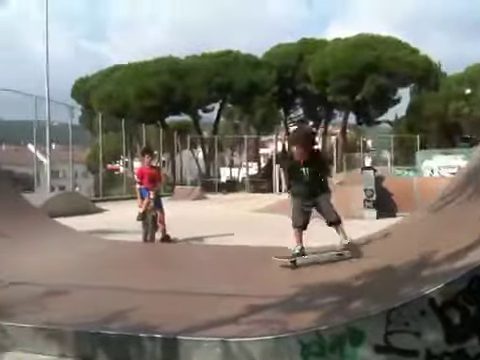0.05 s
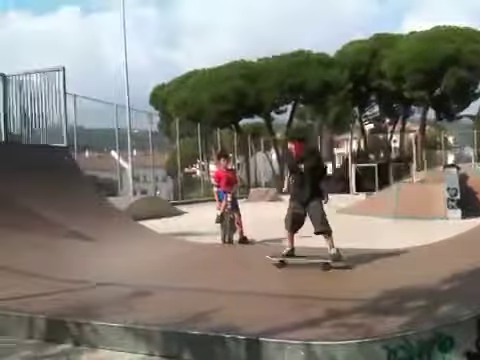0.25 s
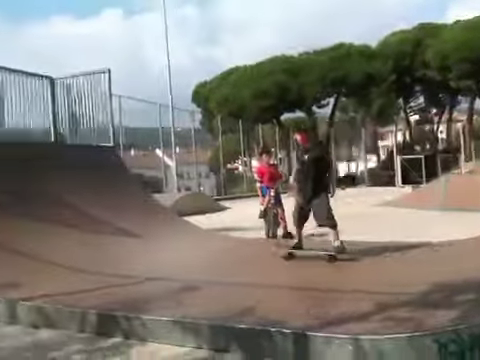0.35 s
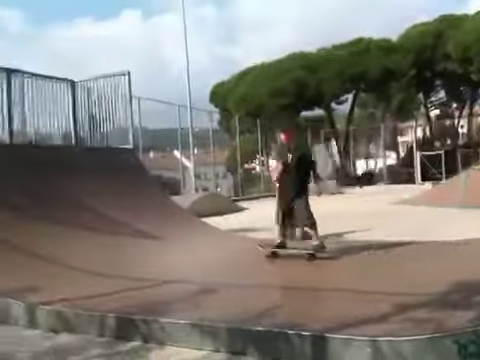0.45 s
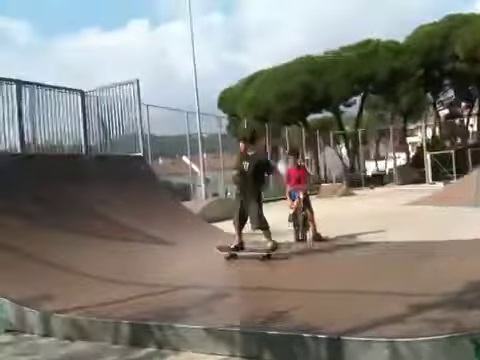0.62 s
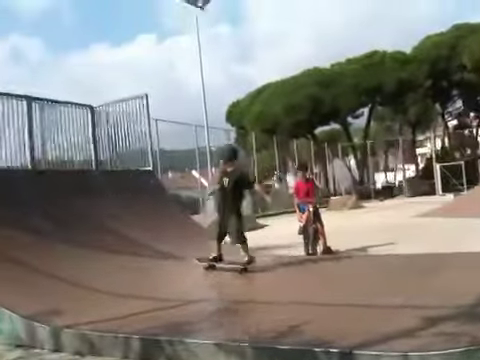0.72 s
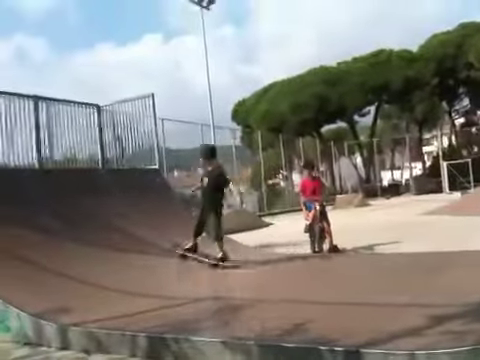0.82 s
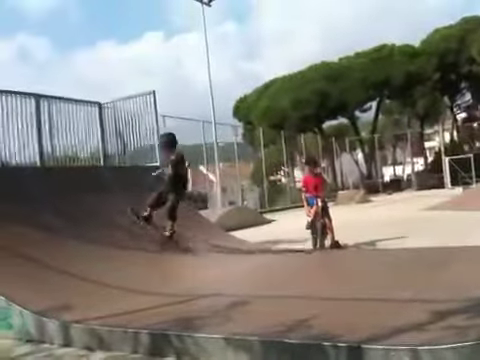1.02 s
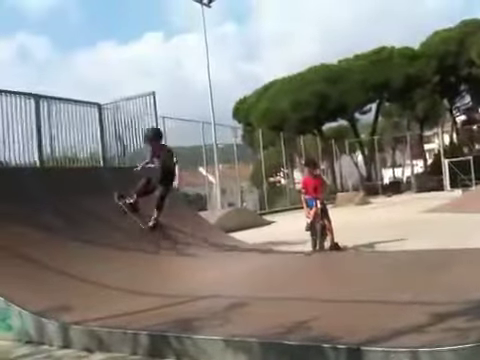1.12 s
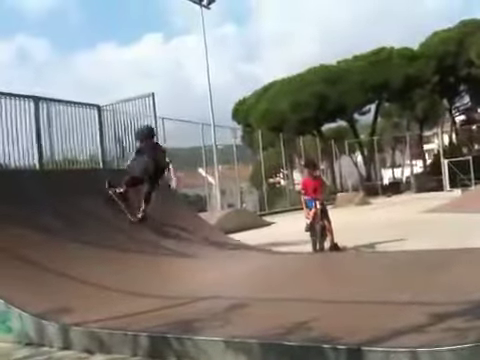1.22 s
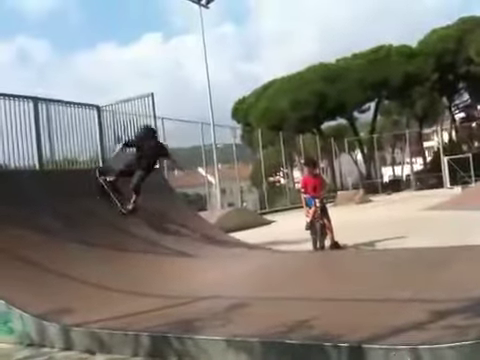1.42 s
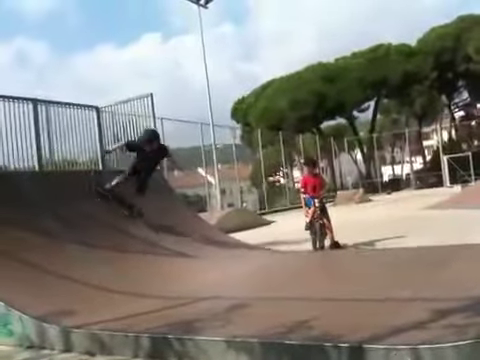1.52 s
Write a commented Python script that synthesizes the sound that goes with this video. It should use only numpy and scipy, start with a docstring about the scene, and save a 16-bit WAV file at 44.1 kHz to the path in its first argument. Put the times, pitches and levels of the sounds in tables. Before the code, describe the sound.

Skateboard wheels roll and rasp over a ramp, clacking at seams as the trucks rattle.

```python
"""A skateboard rolls across the flat of an outdoor ramp and climbs the far wall.
Surface grain drives the ramp into forced vibration, a rumble, while the wheels rasp and hiss.
Impacts at drops and seams excite damped modes: the ramp thumps and the deck clacks.
Metal parts of the trucks rattle, most clearly as the board slows near the top.
The ramp walls scatter a short echo, over faint outdoor air."""
import sys
import numpy as np
from scipy import signal
from scipy.fft import rfft, irfft
from scipy.io import wavfile

SR = 44100
rng = np.random.default_rng(int(sys.argv[2]) if len(sys.argv) > 2 else 0)


def pcm_store(signal):
    """Save signal as 16-bit PCM."""
    levels = np.round(np.clip(np.atleast_2d(signal), -1, 1) * 32767)
    wavfile.write(sys.argv[1], SR, levels.astype(np.int16).T)


N = 68355
TIME = np.arange(N) / SR


def undb(db):
    """Amplitude ratio of a level in decibels."""
    return 10 ** (np.asarray(db) / 20)

def unit(x):
    """Normalisation to rms 1."""
    return x / np.sqrt(np.mean(x ** 2))

def fader(curve):
    """Gain interpolated between (s, dB) points."""
    return undb(np.interp(TIME, *np.array(curve).T))

def rise(t, attack):
    """Raised-cosine onset from 0 to 1."""
    return np.sin(np.pi / 2 * np.clip(t / max(attack, 1e-4), 0, 1)) ** 2

def fade(t, t60):
    """Exponential decay from t = 0, by 60 dB in t60 seconds."""
    return np.exp(-np.log(1000) * np.maximum(t, 0) / max(t60, 1e-3))

def colour(x, points):
    """Spectral shaping by (Hz, dB) points, to rms 1."""
    hz, db = np.array(points).T
    f = np.maximum(np.fft.rfftfreq(len(x), 1 / SR), 1)
    gain = undb(np.interp(np.log(f), np.log(hz), db))
    return unit(irfft(rfft(x) * gain, len(x)))

def resonate(x, hz, width):
    """Second-order resonance, gain 1 at its centre."""
    return signal.lfilter(*signal.iirpeak(hz, hz / width, fs=SR), x)

def grains(per_s, spread_db):
    """Shot noise: random tiny impacts, a few stronger than the rest."""
    impulses = (rng.random(N) < per_s / SR) * rng.choice([-1, 1], N)
    return impulses * undb(spread_db * np.minimum(rng.exponential(size=N), 2 * np.pi))

def add(out, start, x):
    """Superposition of x from a start in seconds."""
    i = max(int(start * SR), 0)
    out[i:i + len(x)] += x[:N - i]


# Each row: frequency in Hz, relative level of the air in dB.
AIR_SPECTRUM = [(25, 7.5), (150, 3), (500, -51), (1000, -46), (3000, -22), (5000, -24), (10000, -6),
                (16000, -11)]
def air():
    """Stationary noise: the faint background of still outdoor air."""
    return undb(-79) * colour(rng.standard_normal(N), AIR_SPECTRUM)

# Each row: frequency in Hz, relative level of the echo in dB.
ECHO_SPECTRUM = [(60, -51), (300, -11.5), (2000, -1), (8000, 3), (16000, -11)]
def wall_echo(board):
    """Diffuse reflection: the ramp walls scatter the sound into a short tail."""
    t = np.arange(SR // 2) / SR
    response = colour(rng.standard_normal(len(t)), ECHO_SPECTRUM) * fade(t, t60=0.11)
    return undb(-16) * signal.fftconvolve(board, response / np.linalg.norm(response))[:N]

# Each row: frequency in Hz, relative level of the scuff in dB.
SCUFF_SPECTRUM = [(500, 6), (1200, -4), (2000, -1), (3300, -6.5), (4200, -13), (6000, -39), (16000, -45)]
def scuff():
    """Stick-slip friction: the wheels slide sideways briefly, then grip again."""
    peak_s, rise_s, fall_s = 0.395, 0.012, 0.006
    t = TIME - peak_s
    swell = np.exp(-(t / np.where(t < 0, rise_s, fall_s)) ** 2 / 2)
    return undb(-46) * swell * colour(grains(per_s=5000, spread_db=1.5), SCUFF_SPECTRUM)

# Each row: deck resonance in Hz, bandwidth in Hz, relative level in dB.
DECK_RESONANCES = [(872, 71, -6), (1284, 44, -6.5)]
def deck_drone():
    """Resonance: grit keeps the deck ringing, swelling with the load in the ramp's curve."""
    peak_s, spread_s = 0.97, 0.087
    grit = grains(per_s=5000, spread_db=1)
    ring = sum(undb(db) * resonate(resonate(grit, hz, width), hz, 2 * width)
               for hz, width, db in DECK_RESONANCES)
    load = np.exp(-((TIME - peak_s) / spread_s) ** 2 / 2)
    return undb(-54) * load * unit(ring)

# Each row: time in seconds, level of the tone in dB.
SING_LEVELS = [(0, -57), (.15, -56.5), (.3, -50), (.6, -46.5), (.9, -54.5), (1.15, -59), (1.35, -81),
               (1.55, -79)]
def wheel_singing():
    """Narrow-band noise: a faint wavering tone glides up as the board gathers speed."""
    start_hz, final_hz, width_hz, glide_s = 438.8, 488, 18.3, 0.0799
    hz = final_hz + (start_hz - final_hz) * np.exp(-TIME / glide_s)
    lowpass = signal.butter(2, width_hz / 2, fs=SR, output="sos")
    waver = signal.sosfilt(lowpass, rng.standard_normal((2, 2 * N)))[:, N:]
    phase = 2 * np.pi * np.cumsum(hz) / SR
    return unit(waver[0] * np.cos(phase) + waver[1] * np.sin(phase)) * fader(SING_LEVELS)

# Dry scrape and sizzle of small loose parts. Each row: frequency in Hz, relative level in dB.
SCRAPE_SPECTRUM = [(800, 8.5), (2200, 7), (3500, 0), (5000, -9), (7000, 4.5), (8800, 4), (10200, -7.5),
                   (12500, -48), (14500, -16), (16000, -25)]
SIZZLE_SPECTRUM = [(5000, -60), (11200, -15.5), (12000, -3.5), (12600, -7), (13500, -13), (16000, -19.5)]
# Each row: metal resonance in Hz, bandwidth in Hz, relative level in dB.
METAL_RESONANCES = [(3400, 330, -8), (4100, 210, -4), (4800, 130, -4), (5010, 220, 0.5), (5720, 160, -9)]
# Each row: start in seconds, time until the decay in seconds, level in dB,
# then metal ring and sizzle, each in dB relative to the scrape.
RATTLE_BURSTS = [(.174, 0.0013, -75, -11, -7), (0.216, .001, -60.5, -8, -12), (.311, 0.0012, -57, -7, -22),
                 (0.41, 0.0011, -53.5, -15, -22), (0.638, 0.0083, -56, -8, -19), (0.691, .002, -49, -3, -4),
                 (0.6975, 0.0025, -36.5, -7.5, -13), (.708, 0.0012, -48, -22, -2),
                 (0.719, 0.0012, -52, -17, -3), (0.735, 0.0037, -54, -22, -12),
                 (0.744, .001, -55, -12, -14), (0.755, .001, -51.5, -17, -11),
                 (0.7985, 0.0022, -42.5, -8, -12), (0.8024, 0.0032, -44, -5, -12),
                 (0.843, 0.0047, -52, -3, -10), (0.8925, 0.0016, -47.5, -7, -13),
                 (0.898, 0.001, -42.5, -17, -11), (0.928, .003, -51.5, 0, -18),
                 (0.9355, 0.0016, -43.5, -6, -7), (0.978, 0.012, -56.5, 3, 5),
                 (1.024, 0.0059, -50.5, 0, -8), (1.184, 0.067, -65, -4, 0), (1.28, .003, -57, 5, -14),
                 (1.357, 0.036, -61.5, 10, 10), (1.381, 0.0024, -48.5, -8, -14), (1.392, 0.0047, -58, 9, 9),
                 (1.401, 0.006, -53.5, 1, -6), (1.45, 0.02, -52.5, 11.5, 4.5), (1.5148, 0.0032, -50, 5, 0)]
def truck_rattles():
    """Repeated impact: trucks and bearings give bursts of clicks that scrape, ring and sizzle."""
    out = np.zeros(N)
    clicks = grains(per_s=6300, spread_db=1.5)
    scrape, sizzle = colour(clicks, SCRAPE_SPECTRUM), colour(clicks, SIZZLE_SPECTRUM)
    metal = unit(sum(undb(db) * resonate(clicks, hz, width) for hz, width, db in METAL_RESONANCES))
    for start, hold, db, ring_db, sizzle_db in RATTLE_BURSTS:
        burst = rise(TIME - start, attack=0.0014) * fade(TIME - start - hold, t60=0.02)
        out += undb(db) * burst * unit(scrape + undb(ring_db) * metal + undb(sizzle_db) * sizzle)
    return out

# Each row: mode frequency in Hz at pitch ratio 1, relative level in dB, t60 in seconds.
DECK_AND_WHEEL_MODES = [(865, -15.5, 0.044), (1257, 0, 0.017), (1512, -1, 0.017), (1943, -22, 0.047),
                        (2460, -20.5, 0.022), (3010, -13.5, .015)]
# Each row: frequency in Hz, relative level of the crack in dB before its tilt.
CRACK_SPECTRUM = [(200, -12), (600, 26), (850, 19), (1300, 13), (2500, 10.5), (3200, -18), (4200, -2),
                  (5500, -36), (16000, -51)]
# Each row: start in seconds, ring level in dB, pitch ratio of the ring,
# crack level in dB, crack tilt in dB per octave.
SEAM_STRIKES = [(0.0743, -69, 1, -53, -0.5), (0.2089, -48, 0.78, -44.5, 5.5),
                (0.3118, -30.5, .92, -31.5, 3.5), (0.316, -48, 2, -38, 4), (0.698, -42.5, 0.84, -42, -10),
                (.8030, -35.5, 0.75, -42, 8), (0.847, -29, .99, -50, 10), (0.9, -32, 0.73, -49, 9),
                (0.9385, -24.5, 1.011, -59, -3), (0.969, -39, 0.79, -53, 8), (1.028, -34.5, 0.78, -58, 8),
                (1.193, -45, 0.58, -57, 7), (1.3822, -55, 0.97, -42.5, 8)]
def seam_clacks():
    """Impulse excitation: a seam cracks against a wheel and the deck's modes ring hollowly."""
    out, t = np.zeros(N), np.arange(SR // 8) / SR
    for start, ring_db, pitch, crack_db, tilt in SEAM_STRIKES:
        # Neighbouring modes swing in opposite senses.
        ring = sum((-1) ** k * undb(db) * np.sin(2 * np.pi * pitch * hz * t) * fade(t, t60)
                   for k, (hz, db, t60) in enumerate(DECK_AND_WHEEL_MODES))
        spectrum = [(hz, db + tilt * np.log2(hz)) for hz, db in CRACK_SPECTRUM]
        crack = colour(rng.standard_normal(len(t)), spectrum) * fade(t, t60=0.018)
        blow = undb(ring_db) * ring / np.abs(ring).max() + undb(crack_db) * crack
        add(out, start, blow * rise(t, attack=0.00095))
    return out

# Each row: mode frequency as a multiple of the pitch, relative level in dB, share of the t60.
RAMP_PANEL_MODES = [(1, -0.5, 0.93), (1.72, -19, 0.21), (2.4, -13, 0.37), (3.5, -26.5, 1)]
# Each row: start in seconds, level in dB, pitch of that spot in Hz, longest t60 in seconds.
WHEEL_DROPS = [(0.2092, -17.5, 231, 0.11), (0.217, -12.5, 148.7, 0.077), (0.3125, -22, 234, 0.15),
               (0.409, -27, 433, 0.036), (0.701, -22, 280, 0.048), (0.8141, -21.5, 159, 0.09),
               (0.8422, -21, 331, 0.034), (0.895, -25, 346, 0.05), (0.9258, -25, 188, 0.087),
               (0.9353, -27, 185, 0.075), (0.9343, -19, 354, 0.046), (1.0226, -29, 205, 0.058),
               (1.078, -25.5, 366, 0.058), (1.192, -26.5, 370, 0.073), (1.195, -33, 137, 0.32),
               (1.381, -29, 212, 0.055), (1.3825, -34, 597, 0.03), (1.3981, -34, 176.4, 0.065),
               (1.45, -44.5, 172.4, 0.23)]
def ramp_thumps():
    """Damped free vibration: a dropping wheel pushes the ramp down and it booms briefly."""
    out, t = np.zeros(N), np.arange(SR // 4) / SR
    for start, db, hz, t60 in WHEEL_DROPS:
        ring = sum(undb(mode_db) * np.sin(2 * np.pi * hz * ratio * t) * fade(t, t60 * share)
                   for ratio, mode_db, share in RAMP_PANEL_MODES)
        add(out, start, -undb(db) * ring * rise(t, attack=1 / hz))
    return out

# Each row: frequency in Hz, relative level of the hiss in dB.
HISS_SPECTRUM = [(1000, -42), (2800, 4), (4000, 1.5), (5000, 2.5), (7000, -1), (8800, -4.5), (10200, -10),
                 (12400, -7.5), (14000, -17), (16000, -17)]
# Each row: time in seconds, level of the hiss in dB.
HISS_LEVELS = [(0, -78), (.29, -76.5), (.4, -65.5), (.6, -63), (.72, -56.5), (.78, -62), (.92, -58),
               (.99, -59.5), (1.1, -64), (1.24, -65), (1.31, -69.5), (1.4, -69.5), (1.55, -64.5)]
def wheel_hiss():
    """Contact noise: fine grit under the wheels gives a grainy treble hiss."""
    grit = unit(grains(per_s=2000, spread_db=2.5))
    return colour(grit + rng.standard_normal(N), HISS_SPECTRUM) * fader(HISS_LEVELS)

# Each row: frequency in Hz, relative level of the rasp in dB.
RASP_SPECTRUM = [(300, 2), (700, 6), (950, 3.5), (1250, 7), (1550, 1.5), (1750, -3.5), (2200, -3),
                 (2700, -9.5), (3800, -11), (6000, -32), (16000, -70)]
# Each row: time in seconds, level of the rasp in dB.
RASP_LEVELS = [(0, -72), (.04, -78.5), (.19, -69), (.24, -59), (.28, -59), (.35, -47.5), (.41, -50.5),
               (.47, -50.5), (.65, -48), (.68, -50.5), (.78, -52.5), (.92, -48.5), (1.03, -51.5),
               (1.1, -56), (1.17, -59), (1.27, -59), (1.34, -65), (1.55, -70)]
def wheel_rasp():
    """Roughness excitation: dense impacts on grit merge into a midrange rasp."""
    return colour(grains(per_s=5000, spread_db=1), RASP_SPECTRUM) * fader(RASP_LEVELS)

# Low-mid rumble and bass boom. Each row: frequency in Hz, relative level in dB.
RUMBLE_SPECTRUM = [(60, -67), (150, -11), (240, -0.5), (310, 0.5), (400, -2), (500, -4.5), (580, -7),
                   (720, -13), (900, -26.5), (1500, -35), (4000, -83)]
BOOM_SPECTRUM = [(25, -31), (60, -83), (90, -15.5), (120, -1), (165, 2), (215, -2), (280, -7), (450, -65),
                 (2000, -82)]
# Their envelopes. Each row: time in seconds, level in dB.
RUMBLE_LEVELS = [(0, -62.5), (.04, -58), (.16, -52), (.25, -39), (.42, -43.5), (.66, -41.5), (.8, -38),
                 (.92, -37), (1.02, -44), (1.13, -43), (1.3, -51), (1.36, -59.5), (1.41, -50), (1.47, -68),
                 (1.55, -74)]
BOOM_LEVELS = [(0, -44), (.05, -47.5), (.16, -50), (.26, -35.5), (.42, -48), (.5, -42), (.66, -48.5),
               (.8, -43), (.92, -37), (1.05, -41.5), (1.2, -48), (1.29, -43.5), (1.36, -49), (1.41, -48),
               (1.5, -64.5), (1.55, -67)]
# Each row: ramp resonance in Hz, bandwidth in Hz, relative level in dB.
RAMP_RESONANCES = [(243, 5.8, 1), (420, 15, 3), (720, 9.7, 3)]
def ramp_rumble():
    """Forced vibration: bumps shake the ramp, which rumbles, booms and hums at its resonances."""
    bumps, bass_bumps = (grains(per_s=2600, spread_db=3) for _ in range(2))
    hum = sum(undb(db) * resonate(bumps, hz, width) for hz, width, db in RAMP_RESONANCES)
    rumble = colour(bumps + undb(-11.5) * hum, RUMBLE_SPECTRUM) * fader(RUMBLE_LEVELS)
    boom = colour(bass_bumps, BOOM_SPECTRUM) * fader(BOOM_LEVELS)
    return rumble + boom

def rolling():
    """Amplitude modulation: the rolling noise throbs once with each turn of the wheels."""
    turns_per_s, throb_db = 21, 1.3
    angle = 2 * np.pi * (turns_per_s * TIME + rng.random())
    noise = ramp_rumble() + wheel_rasp() + wheel_hiss() + wheel_singing()
    return noise * undb(throb_db * np.sin(angle))


def scene():
    """Superposition: the board, its echo and the air sum in one channel."""
    board = rolling() + deck_drone() + ramp_thumps() + seam_clacks() + truck_rattles() + scuff()
    return (board + wall_echo(board) + air())[None]

def record(dry):
    """Band limiting: the microphone thins the deep bass, and the highest treble is cut."""
    bass_hz, top_hz = 62, 15650
    thinned = signal.sosfilt(signal.butter(2, bass_hz, "high", fs=SR, output="sos"), dry)
    return signal.sosfilt(signal.ellip(10, .2, 80, top_hz, fs=SR, output="sos"), thinned)


dry = scene()
out = record(dry)
pcm_store(out)
```